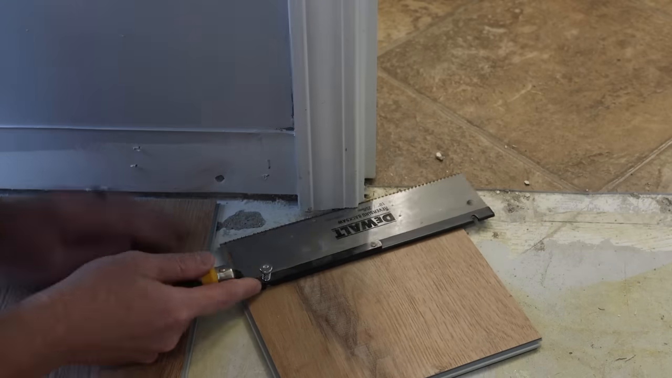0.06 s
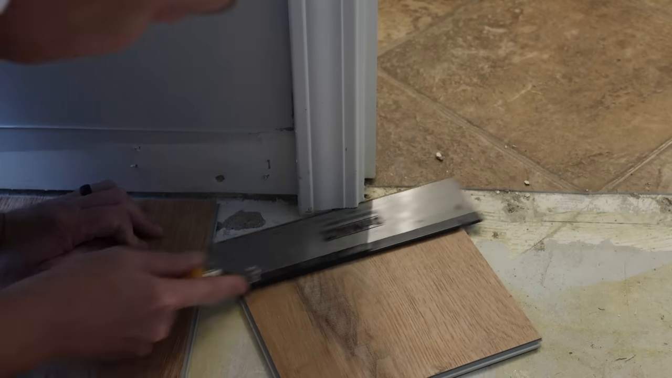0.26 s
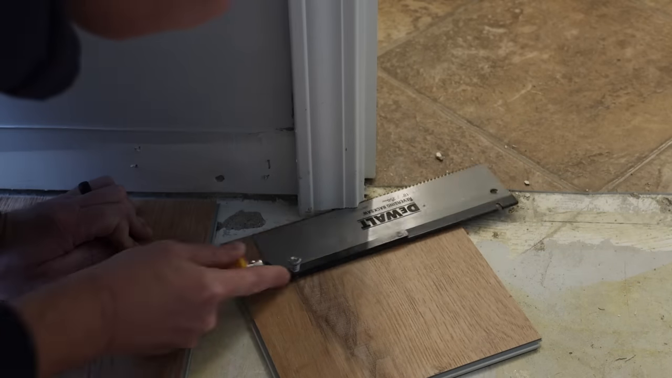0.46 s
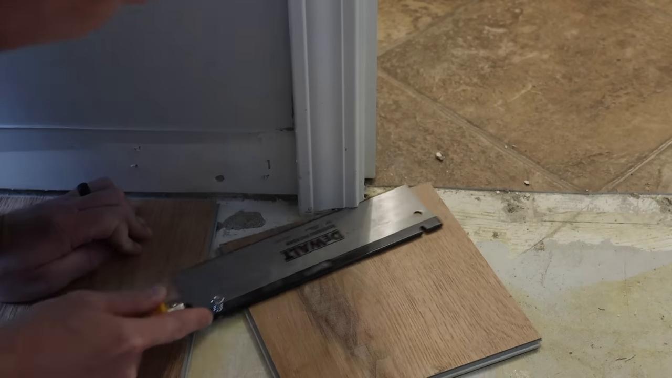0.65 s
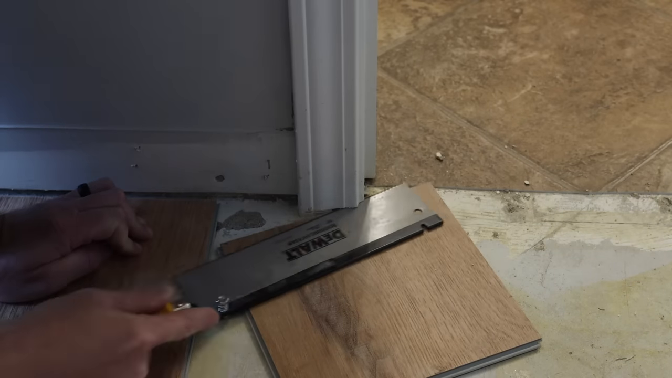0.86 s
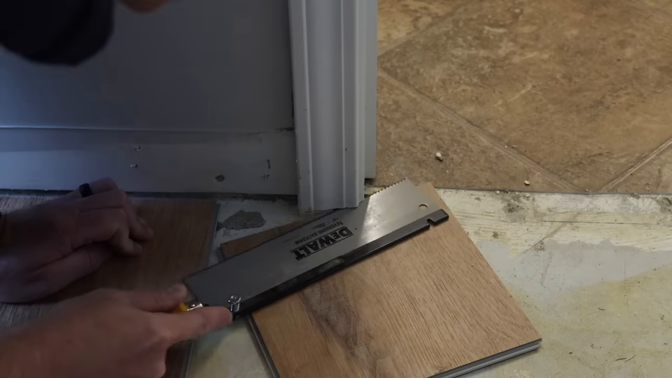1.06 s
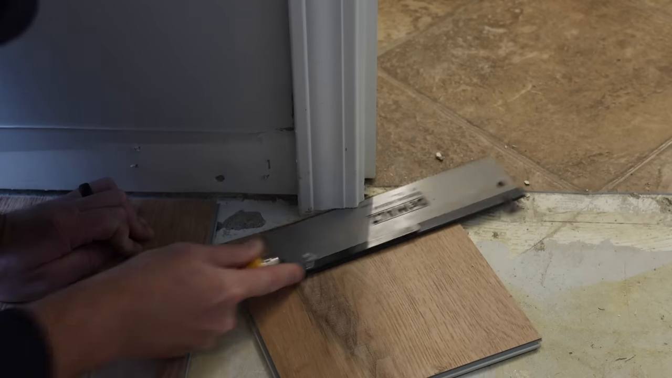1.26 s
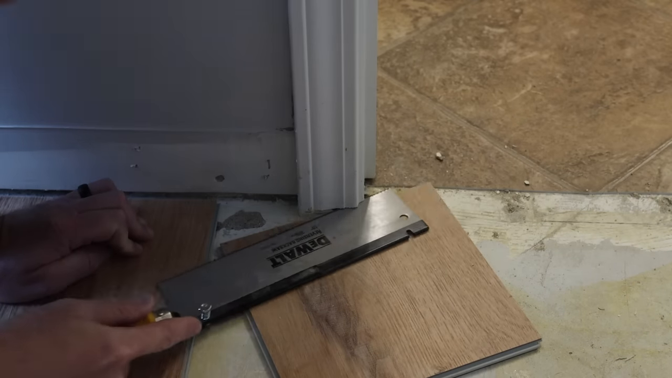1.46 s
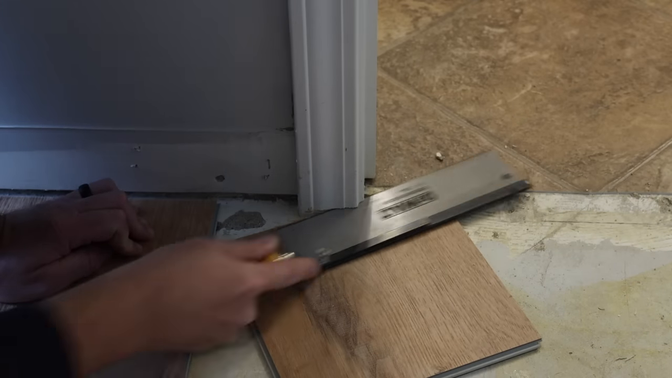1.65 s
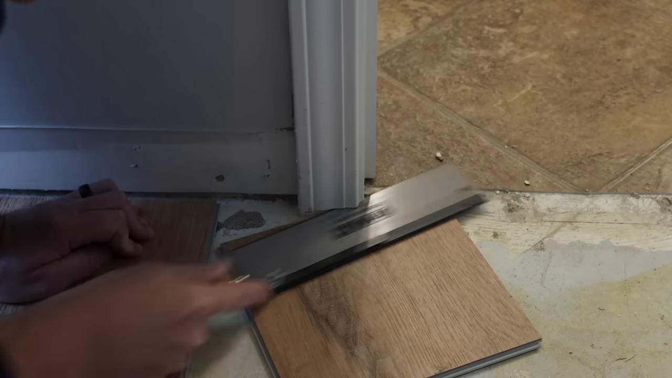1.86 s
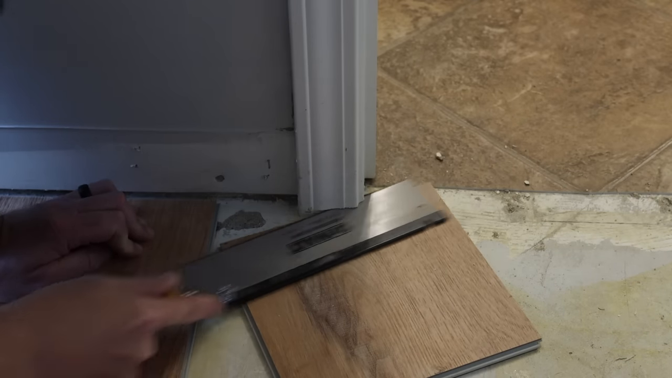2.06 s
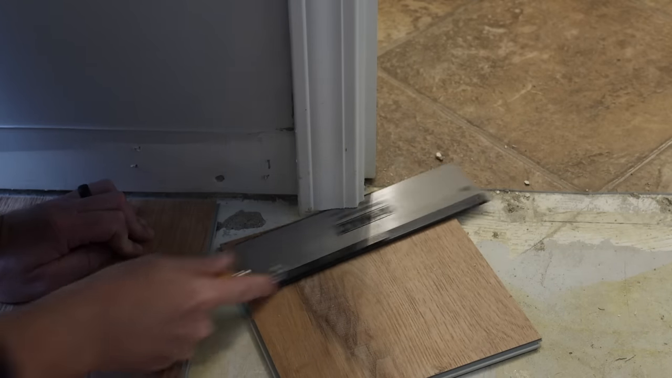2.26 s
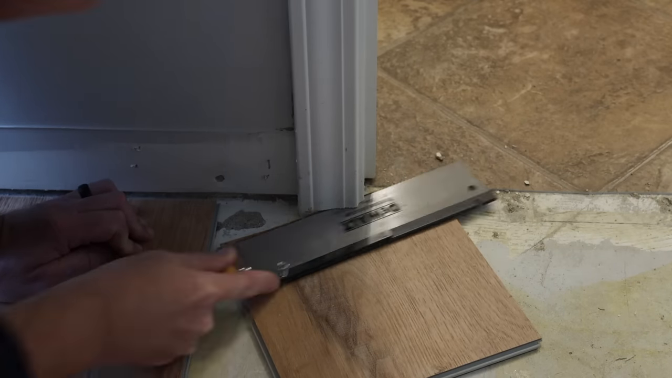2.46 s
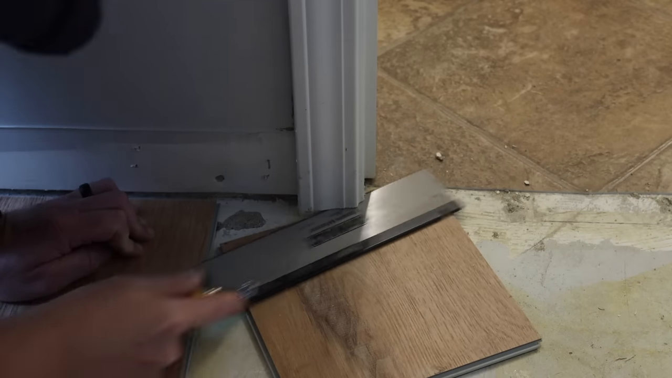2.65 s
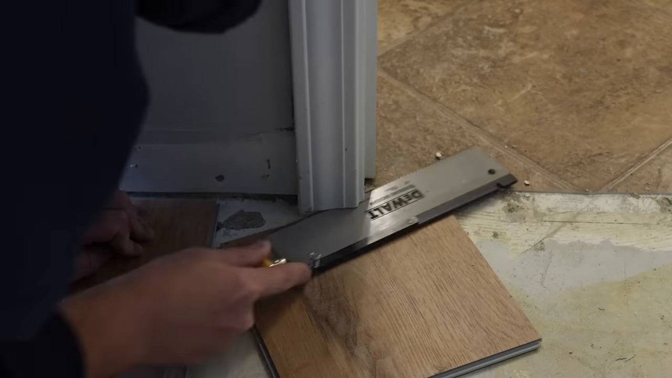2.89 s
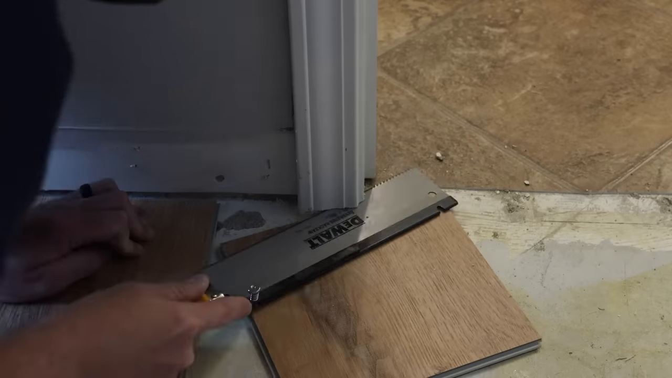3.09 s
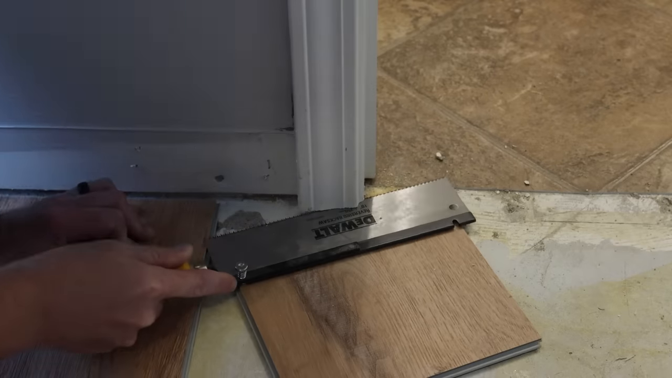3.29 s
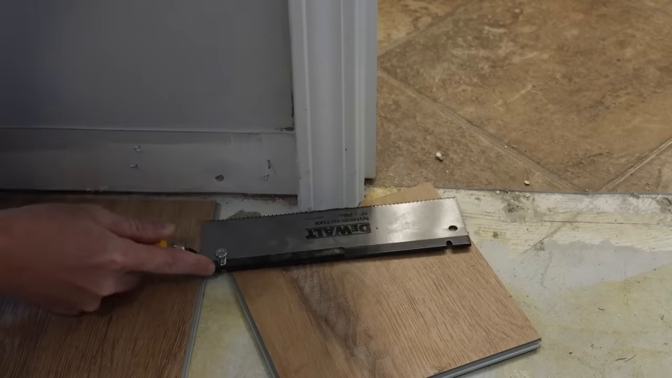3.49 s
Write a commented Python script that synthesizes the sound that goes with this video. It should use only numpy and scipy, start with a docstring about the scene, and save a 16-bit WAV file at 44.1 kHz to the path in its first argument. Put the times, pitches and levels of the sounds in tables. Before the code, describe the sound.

Close-up hand sawing in a small bare room: fast, dry, scratchy strokes with woody thrumming underneath, halting briefly three times with light blade scrapes, then a long unbroken run that ends suddenly.

```python
"""Hand saw on a door trim, close

A short hand saw lies flat on an offcut and is worked to and fro through the foot of a painted door trim.
Each stroke rasps, as noise in bands with ringing snags, and sets trim and offcut thrumming, as wavering
tones over a low rumble. The work breaks off briefly at times; the blade drags, short ticks stand out and
the offcut thuds.
A small hard room of decaying echoes, a faint floor of coloured noise, one microphone close by.
"""
import sys
import numpy as np
from scipy import signal
from scipy.fft import rfft, irfft, next_fast_len
from scipy.io import wavfile
from scipy.ndimage import uniform_filter1d

SR = 44100
rng = np.random.default_rng(int(sys.argv[2]) if len(sys.argv) > 2 else 0)


def generate_wav(sig):
    """Save sig (samples, or channels by samples) to the path in sys.argv[1] as 16-bit PCM at SR."""
    pcm = np.round(np.clip(np.atleast_2d(sig).T, -1, 1) * 32767).astype(np.int16)
    wavfile.write(sys.argv[1], SR, pcm)


N = 154350

# Saw strokes, with a few light drags and knocks in the pauses: [middle t/s, length/s, rasp level/dB,
# rasp treble/dB, low thrum lag/s, low thrum level/dB, low thrum f/Hz, upper thrum level/dB, upper thrum f/Hz]
STROKES = [(0.005, 0.03, -49, -7, -0.0076, -29.5, 243, -41.5, 442),
           (0.13, 0.025, -45, -1, 0.011, -59, 228, -52, 637),
           (0.17, 0.033, -49.5, -3.5, 0.005, -43.5, 232, -44.5, 533),
           (0.226, 0.032, -36, -3.5, 0.014, -24.5, 246.6, -31.5, 450.3),
           (0.266, 0.021, -41, 4, 0.0021, -34, 255.4, -47, 419),
           (0.315, 0.033, -39, -1.5, 0.014, -26.5, 248.7, -32, 429.4),
           (0.358, 0.026, -39, 0.5, 0.0029, -34, 250, -37, 427.6),
           (0.408, 0.028, -34.5, 1.5, 0.0076, -28, 216, -29.8, 421),
           (0.45, 0.034, -37.5, -5, -0.0012, -30, 161.2, -38.5, 443),
           (0.502, 0.03, -32.5, -1, 0.0031, -22.5, 261.6, -29, 433.7),
           (0.543, 0.028, -34, -3.5, -0.003, -29.5, 212, -29.5, 545),
           (0.719, 0.027, -55.5, -7, 0.025, -41, 179.7, -56, 430),
           (0.77, 0.028, -31, -1, 0.00026, -20, 227.6, -33.5, 438),
           (0.815, 0.027, -35, -1, -0.0082, -35, 224, -34.5, 475),
           (0.856, 0.028, -32.5, 0, 0.0068, -20.5, 181.5, -31, 467),
           (0.898, 0.029, -34.5, -1, 0.008, -57, 186, -32, 414.5),
           (0.938, 0.022, -33, 3.5, 0.0094, -16.5, 196.5, -25, 423),
           (0.977, 0.031, -34, -3.5, 0.0079, -37, 181, -28.5, 458),
           (1.022, 0.024, -33.5, 1.5, 0.0058, -27.5, 128.8, -26.5, 395.4),
           (1.061, 0.028, -35.5, -2.5, 0.004, -31.5, 214.6, -28, 397.2),
           (1.09, 0.031, -56, -13, 0.004, -51, 263, -39, 588),
           (1.159, 0.039, -58, -7, -0.0045, -50, 230, -50, 572),
           (1.212, 0.031, -36.5, -1.7, -0.0077, -23.5, 203.6, -30.5, 408.4),
           (1.253, 0.027, -38, -1, 0.0037, -31.5, 214.4, -35, 521),
           (1.297, 0.029, -32, 0.5, -0.00069, -27, 217.2, -31.5, 482),
           (1.338, 0.021, -31, -3, 0.011, -29.5, 241.7, -27.5, 435.6),
           (1.435, 0.021, -56, 5, 0.052, -50, 227, -44, 455),
           (1.458, 0.013, -57, 0, 0.0032, -29, 228.6, -43, 420),
           (1.515, 0.019, -55, -4, 0.033, -48, 204, -68, 490),
           (1.554, 0.031, -33, 0, -0.00044, -24.5, 220.6, -28, 411),
           (1.595, 0.03, -35, -1.5, 0.029, -29, 226.5, -30.5, 572),
           (1.635, 0.023, -31, 1, -0.018, -55, 220, -29, 409),
           (1.671, 0.031, -34, -5.5, 0.034, -28.5, 235.2, -30.5, 372),
           (1.712, 0.025, -30, -1.5, -0.00084, -23, 240.9, -28, 427),
           (1.748, 0.026, -33, -1.5, 0.014, -34, 212, -31.5, 502),
           (1.789, 0.028, -31.5, -2.5, 0.0018, -23.5, 214, -30, 413),
           (1.832, 0.025, -30.5, -3, 0.012, -35, 224, -23, 500),
           (1.879, 0.028, -31, -1, 0.00082, -25, 226, -37, 510),
           (1.922, 0.03, -35.5, 0, 0.028, -27.5, 227.5, -26.5, 425.4),
           (1.966, 0.026, -31, -3.5, 0.0042, -20, 219, -35, 417.4),
           (2.003, 0.03, -34.5, -6.5, 0.023, -31, 210, -27, 482.4),
           (2.045, 0.023, -35, 2.5, 0.016, -22.5, 145.6, -25.5, 450),
           (2.087, 0.031, -36.5, -5.5, 0.016, -46, 157, -32, 552.6),
           (2.128, 0.023, -35, 1, 0.011, -30, 213, -33, 514.5),
           (2.168, 0.03, -37, -4.5, 0.021, -32.5, 243, -33, 583),
           (2.227, 0.031, -35.5, -3, 0.02, -24, 140, -28.5, 348),
           (2.272, 0.037, -39.5, -5, -0.0028, -30.5, 227.5, -32, 560),
           (2.316, 0.021, -34.5, -1, 0.0014, -28, 175.3, -24, 437.6),
           (2.357, 0.033, -36.5, -3, 0.016, -37, 216.7, -32, 522.5),
           (2.415, 0.036, -38.5, -1, -0.0045, -23, 215, -26, 449),
           (2.465, 0.042, -39.5, -5.5, -0.02, -25, 205.4, -31.5, 504.3),
           (2.509, 0.023, -34.5, -3.9, -0.0058, -28.5, 175, -37.5, 449),
           (2.55, 0.028, -36, -6.0, 0.0095, -37, 227.0, -29.5, 539),
           (2.596, 0.025, -34, -4, 0.009, -29.5, 175, -25.5, 415.3),
           (2.637, 0.034, -37, -6, -0.0013, -42, 175, -32.5, 474),
           (2.684, 0.023, -34, -2, 0.0058, -25, 218.4, -24, 431),
           (2.719, 0.029, -35.0, -9.5, 0.004, -31.5, 242, -31, 518.5),
           (2.763, 0.025, -34, -2.5, 0.0035, -25, 260.3, -26, 372.7),
           (2.802, 0.029, -37.5, -7, -0.0048, -28.5, 252.7, -37, 382),
           (2.845, 0.026, -32.5, -2.5, 0.0027, -31, 208.3, -22, 420),
           (2.884, 0.021, -34.5, -10, -0.011, -49, 245, -33, 526.5),
           (2.93, 0.026, -32, -1.5, -0.00085, -17.5, 221.2, -25, 413.3),
           (2.97, 0.025, -35, -7.5, 0.009, -32, 222, -30.5, 569),
           (3.013, 0.024, -30.5, -5, 0.0015, -29, 278.3, -25, 430.2),
           (3.052, 0.025, -33.5, -7, -0.003, -33, 225.5, -29.5, 582),
           (3.095, 0.025, -31.5, -2, 0.015, -24.5, 281.5, -27, 497.5),
           (3.13, 0.028, -33.5, -6.5, 0.0096, -42, 294, -29.5, 531),
           (3.177, 0.026, -32.5, -0.5, 0.0049, -28, 135.7, -33, 403),
           (3.22, 0.025, -34, -3.5, 0.0066, -35, 166.5, -32, 523),
           (3.266, 0.029, -37, -1.5, 0.018, -35.5, 163, -40.5, 520),
           (3.331, 0.028, -54, -5, 0.013, -51, 176, -52, 479)]
# Teeth tearing wood, relative spectrum: [f/Hz, level per Hz/dB]
RASP_SPECTRUM = [(470, -10.5), (800, 0.5), (1080, -5), (1210, -8), (1530, -2), (1910, -2), (3300, -6),
                 (4120, -5), (4910, -10.5), (6780, -9.5), (8800, -18.5), (12800, -20), (15600, -28.5)]
# The rasp's loudest region moves as the cut deepens: [t/s, f/Hz, lift/dB]
BITE = [(0, 2430, 2), (1.3, 2400, 8), (1.65, 1720, 9.5), (2.2, 1800, 5), (2.75, 2660, 4), (3.5, 2900, -0.5)]
# Rumble of trim and offcut, relative spectrum: [f/Hz, level per Hz/dB]
WOOD_SPECTRUM = [(18, -68), (30, -70.5), (122, -2), (177, -3), (216, 2.5), (333, -10), (427, -1), (461, -3),
                 (647, -5.5), (755, -17.5), (1200, -27.5), (1560, -86), (2640, -120)]
# The blade drags, mostly between strokes: [start t/s, length/s, level/dB]
SLIDES = [(0.108, 0.078, -46.5), (0.579, 0.02, -49), (0.712, 0.03, -57), (0.643, 0.054, -61.5),
          (1.355, 0.025, -49), (1.418, 0.018, -55), (3.295, 0.068, -55), (0.02, 0.04, -54),
          (1.143, 0.16, -61), (3.40, .035, -67), (3.463, .045, -65)]
# Dragging blade, relative spectrum: [f/Hz, level per Hz/dB]
SLIDE_SPECTRUM = [(150, -27), (300, -7), (600, -7), (1000, 1), (2540, -11), (6700, -11), (15600, -29)]
# Ticks of the blade, and teeth catching under strokes: [t/s, level/dB, f/Hz]
TICKS = [(.657, -43, 2270), (1.167, -45.5, 2100), (1.170, -50, 2868), (1.338, -29.5, 2308),
         (1.627, -31.5, 1570), (1.708, -29, 1960), (1.823, -29, 2030), (1.837, -37, 7200),
         (1.916, -28, 1966)]
# The offcut thuds on the floor: [t/s, level/dB]
THUDS = [(0.754, -32), (0.842, -37), (1.189, -36)]
# Room noise, relative spectrum: [f/Hz, level per Hz/dB]
FLOOR_SPECTRUM = [(24, -48), (40, -38), (142, 0), (422, 2), (568, -8.5), (4340, -18), (8270, -25),
                  (15000, -25)]

# Rasp: bell spread as a share of stroke length, narrowed before the middle, and a dying tail
RASP_SKIRT, RASP_RISE_SHARE, RASP_TAIL_S, RASP_TAIL_DB = 0.43, 0.95, 0.018, -33
TREBLE_FROM_HZ, TREBLE_MEAN_DB, TREBLE_OCTAVES = 3020, -5, 0.19  # place, zero and width of the treble step
BITE_OCTAVES = 0.12  # width of the lift
PATCHY_DB, PATCHES_PER_S = 2, 33.6  # the colour of the rasp flickers band by band
TEARS_PER_S, TEAR_SPREAD_DB, TEAR_SHARE = 2500, 3, 0.45
TEAR_TOP = 2.9  # largest tear or snag, in spreads
CATCHES_PER_S, CATCH_DB = 90, -12.5
CATCH_LOW_HZ, CATCH_HIGH_HZ, CATCH_CYCLES = 1480, 7570, 9.9  # cycles to fall 60 dB

# Thrum: wood starts more sharply than it dies
SPLIT_HZ, WOOD_RISE_SHARE = 296, 0.64  # the rumble is split between low and upper thrum
LOW_SKIRT_S, LOW_TAIL_S, LOW_WANDER_HZ, LOW_RUMBLE_DB = 0.0077, 0.006, 26.6, -6
UPPER_SKIRT_S, UPPER_TAIL_S, UPPER_WANDER_HZ, UPPER_RUMBLE_DB = 0.0095, 0.03, 22.5, -6.5
UPPER_LAG_S = -0.00098
WANDER_RATE_HZ, FLUTTER_DB = 66.4, 1.5  # pitch wander; unevenness within a stroke
RUMBLE_EVEN_S = 0.0197  # span over which the rumble is evened out

SLIDE_FADE_DB, SLIDE_EDGE_S = -4, 0.0032
TICK_PEAK_S, TICK_WIDTH_HZ, TICK_CRACK_DB = 0.0024, 370, -22
THUD_HZ, THUD_T60_S = 52, 0.054
ROOM_T60_S, ROOM_DB, WALL_CUT_HZ = 0.25, -17, 3200
FLOOR_DB, FLOOR_SWAY_DB = -66.5, 1.5
LOW_CUT_HZ, TOP_CUT_HZ = 90.5, 16050  # a high-pass thins everything but the thuds below the first


def rasp():
    """Tears under each stroke in half-octave bands; treble, bite and flicker set the gain of each band."""
    power, treble = np.full(N, 1e-18), np.zeros(N)
    for middle, length, db, treble_db, *_ in STROKES:
        i, shape = swell(middle, RASP_SKIRT * length, RASP_TAIL_S, RASP_TAIL_DB, RASP_RISE_SHARE)
        stroke_power = (from_db(db) * shape) ** 2
        power[i] += stroke_power
        treble[i] += stroke_power * (treble_db - TREBLE_MEAN_DB)
    tilt_db = treble / power  # overlapping strokes share the treble by power

    bite_t, *columns = np.transpose(BITE)
    bite_hz, lift_db = (np.interp(np.arange(N) / SR, bite_t, column) for column in columns)
    spectrum = rfft(coloured(tears(), RASP_SPECTRUM))
    octave = np.log2(np.arange(N // 2 + 1) * SR / N + 1)
    out = 0
    for centre in np.arange(8.5, 14.5, .5):
        band = irfft(spectrum * np.clip(1 - 2 * abs(octave - centre), 0, 1), N)
        # half the tilt above the treble step, half the opposite way below it
        db = tilt_db * np.tanh((centre - np.log2(TREBLE_FROM_HZ)) / TREBLE_OCTAVES) / 2
        db = db + lift_db * np.exp(-((centre - np.log2(bite_hz)) / BITE_OCTAVES) ** 2 / 2)
        out = out + band * from_db(db + PATCHY_DB * drift(PATCHES_PER_S))
    return np.sqrt(power) * (out + from_db(CATCH_DB) * catches())


def tears():
    """Dense uneven tears of fibre over friction hiss."""
    sizes = uneven_sizes() * rng.choice([-1, 1], N)
    torn = rms_one(sizes * (rng.random(N) < TEARS_PER_S / SR))
    return TEAR_SHARE * torn + (1 - TEAR_SHARE) * rng.standard_normal(N)


def catches():
    """Single teeth snag unevenly, each ringing the blade a few cycles at one of eight pitches."""
    snags = uneven_sizes() * (rng.random(N) < CATCHES_PER_S / SR)
    dealt = rng.integers(0, 8, N)
    pitches = np.geomspace(CATCH_LOW_HZ, CATCH_HIGH_HZ, 8)
    return rms_one(sum(ring(snags * (dealt == k), hz, CATCH_CYCLES / hz) for k, hz in enumerate(pitches)))


def wood():
    """Low and upper thrum of trim and offcut, each with its part of one rumble."""
    middle, _, _, _, lag, low_db, low_hz, upper_db, upper_hz = np.transpose(STROKES)
    rumble = coloured(rng.standard_normal(N), WOOD_SPECTRUM)
    low = thrum(np.transpose([middle + lag, low_db, low_hz]), LOW_SKIRT_S, LOW_TAIL_S, LOW_WANDER_HZ,
                butter(rumble, SPLIT_HZ, "low"), LOW_RUMBLE_DB)
    upper = thrum(np.transpose([middle + UPPER_LAG_S, upper_db, upper_hz]), UPPER_SKIRT_S, UPPER_TAIL_S,
                  UPPER_WANDER_HZ, butter(rumble, SPLIT_HZ, "high"), UPPER_RUMBLE_DB)
    return low + upper


def thrum(strokes, skirt, tail, wander_hz, rumble, rumble_db):
    """Each row (s, dB, Hz) shakes the wood at a wandering pitch, with rumble under it."""
    tone, power = np.zeros(N), np.zeros(N)
    wander = wander_hz * drift(WANDER_RATE_HZ)
    for (s, db, hz), phase in zip(strokes, rng.random(len(strokes))):
        i, shape = swell(s, skirt, tail, -18.5, WOOD_RISE_SHARE)
        cycles = phase + np.cumsum(hz + wander[i]) / SR
        tone[i] += from_db(db) * shape * np.sqrt(2) * np.sin(2 * np.pi * cycles)
        # the rumble swells wider than the tone
        _, wide = swell(s, 2.33 * skirt, tail, -2.5, WOOD_RISE_SHARE)
        power[i] += (from_db(db) * wide) ** 2
    local_power = uniform_filter1d(rumble ** 2, int(RUMBLE_EVEN_S * SR))
    even = rms_one(rumble / (local_power + 1e-4) ** 0.4)
    fluttered = tone * from_db(FLUTTER_DB * drift(2 * WANDER_RATE_HZ))
    return fluttered + from_db(rumble_db) * np.sqrt(power) * even


def slides():
    """The dragging blade: coloured tears that start and stop abruptly and fade on the way."""
    t, gain = np.arange(N) / SR, 0
    for s, length, db in SLIDES:
        # the stop takes four times as long as the start
        edges = np.clip(np.minimum(t - s, (s + length - t) / 4) / SLIDE_EDGE_S, 0, 1)
        gain = gain + edges * from_db(db + SLIDE_FADE_DB * np.clip((t - s) / length, 0, 1))
    return gain * coloured(tears(), SLIDE_SPECTRUM)


def ticks():
    """A brief dry scratch: a tone, noise through one broad resonance and a little crack."""
    t, out, noise = np.arange(N) / SR, 0, rng.standard_normal(N)
    for s, db, hz in TICKS:
        late = np.maximum(t - s, 0) / TICK_PEAK_S
        shape = np.e ** 2 * late ** 2 * np.exp(-2 * late)  # height 1 at late = 1
        tone = np.sin(2 * np.pi * hz * t) + 0.87 * rms_one(resonance(noise, hz, TICK_WIDTH_HZ))
        out = out + from_db(db) * shape * (tone + from_db(TICK_CRACK_DB) * noise)
    return out


def thuds():
    """Each knock of the offcut sets one low, short mode of the floor ringing."""
    clicks = np.zeros(N)
    for s, db in THUDS:
        clicks[int(s * SR)] = from_db(db)
    return ring(clicks, THUD_HZ, THUD_T60_S)


def room(x):
    """Dense decaying echoes after 6 ms, dulled by the walls."""
    t = np.arange(int(.5 * SR)) / SR
    echoes = rng.standard_normal(len(t)) * from_db(-60 * t / ROOM_T60_S) * (t > .006)
    echoes = signal.lfilter([1], [1, -np.exp(-2 * np.pi * WALL_CUT_HZ / SR)], echoes)
    return from_db(ROOM_DB) * signal.fftconvolve(x, echoes / np.sqrt(np.sum(echoes ** 2)))[:N]


def room_noise():
    """Faint coloured noise whose level sways slowly."""
    level = from_db(FLOOR_DB + FLOOR_SWAY_DB * drift(2.9))
    return level * coloured(rng.standard_normal(N), FLOOR_SPECTRUM)


def swell(middle, skirt, tail, tail_db, rise):
    """A bell around the middle of a stroke that leaves a dying tail; returns (samples, shape)."""
    i = np.arange(max(int((middle - .06) * SR), 0), min(int((middle + .2) * SR), N))
    t = i / SR - middle
    bell = np.exp(-(t / (skirt * np.where(t < 0, rise, 1))) ** 2 / 2)
    return i, np.hypot(bell, from_db(tail_db) * np.where(t < 0, bell, np.exp(-t / tail)))


def uneven_sizes():
    """Chance sizes, exponential in dB up to a limit."""
    return from_db(TEAR_SPREAD_DB * np.minimum(rng.exponential(1, N), TEAR_TOP))


def ring(clicks, hz, t60):
    """A unit click sets a decaying sine of starting height 1 ringing."""
    r, w = from_db(-60 / (t60 * SR)), 2 * np.pi * hz / SR
    return signal.lfilter([0, np.sin(w)], [1, -2 * r * np.cos(w), r * r], clicks + 1e-18)


def resonance(x, hz, width):
    """Two-pole peak with gain 1 on top."""
    r = np.exp(-np.pi * width / SR)
    poles = [1, -2 * r * np.cos(2 * np.pi * hz / SR), r * r]
    return signal.lfilter(np.array([1, 0, -1]) * (1 - r * r) / 2, poles, x)


def coloured(x, spectrum):
    """Gives x the spectrum of a (Hz, dB) table with minimum phase, so nothing sounds early; rms 1."""
    size = next_fast_len(2 * N)
    size += size % 2
    hz, db = np.transpose(spectrum)
    bins_hz = np.arange(size // 2 + 1) * SR / size
    cepstrum = irfft(np.log(10) / 20 * np.interp(np.log(bins_hz + 1), np.log(hz), db), size)
    cepstrum[1:size // 2] *= 2  # folded onto positive time
    cepstrum[size // 2 + 1:] = 0
    return rms_one(irfft(rfft(x, size) * np.exp(rfft(cepstrum)), size)[:N])


def butter(x, hz, kind):
    """Fourth-order low- or high-pass."""
    return signal.sosfilt(signal.butter(4, hz, kind, fs=SR, output="sos"), x)


def drift(rate):
    """Slow chance of rms 1: noise through two equal low-pass poles at rate Hz."""
    r = np.exp(-2 * np.pi * rate / SR)
    # the first second, where the filter settles, is left out
    return rms_one(signal.lfilter([1], [1, -2 * r, r * r], rng.standard_normal(N + SR))[SR:])


def from_db(db):
    """Decibels to gain."""
    return 10 ** (np.asarray(db) / 20)


def rms_one(x):
    """Scaled to rms 1."""
    return x / np.sqrt(np.mean(x ** 2) + 1e-20)


def scene():
    """Saw and wood in the room, ticks dry, over room noise; thuds come through the floor."""
    near = rasp() + slides() + wood()
    airborne = near + room(near) + ticks() + room_noise()
    return (butter(airborne, LOW_CUT_HZ, "high") + thuds())[None]


def record(dry):
    """The microphone signal: a steep low-pass cuts the top."""
    return signal.sosfilt(signal.cheby2(20, 70, TOP_CUT_HZ, fs=SR, output="sos"), dry)


dry = scene()
out = record(dry)
generate_wav(out)
```